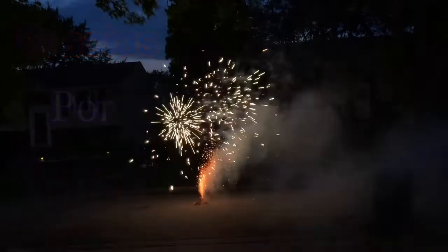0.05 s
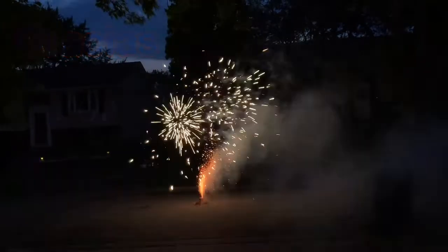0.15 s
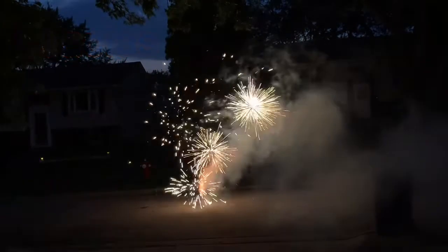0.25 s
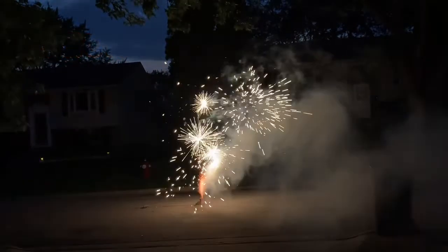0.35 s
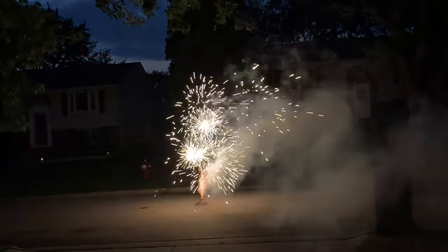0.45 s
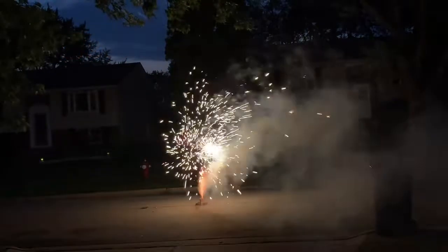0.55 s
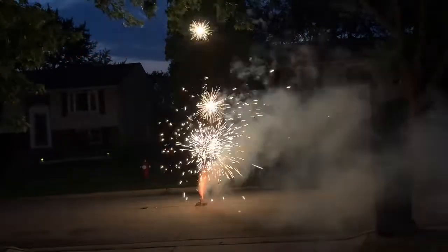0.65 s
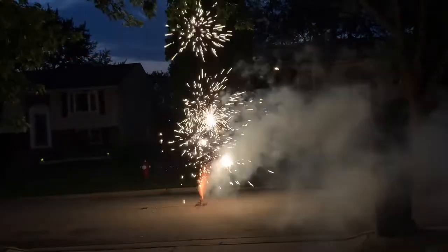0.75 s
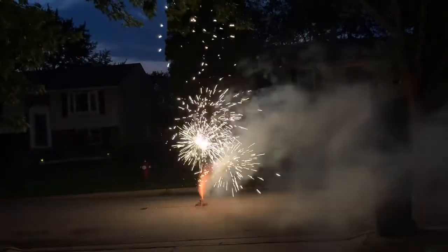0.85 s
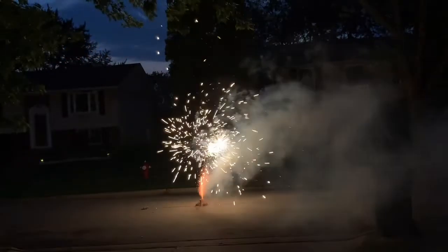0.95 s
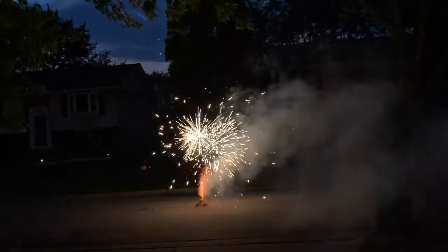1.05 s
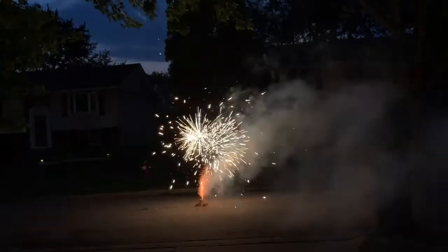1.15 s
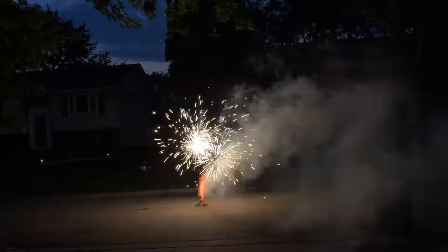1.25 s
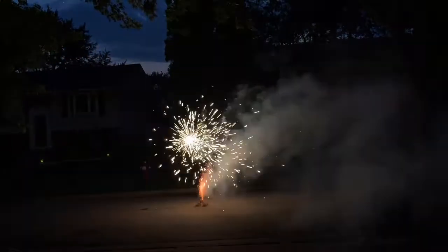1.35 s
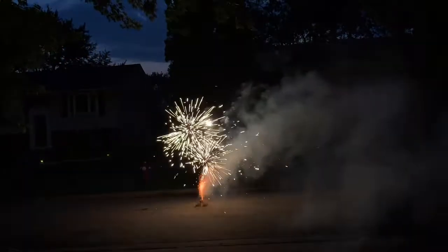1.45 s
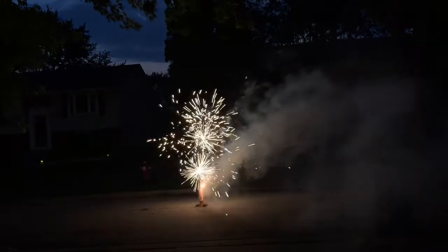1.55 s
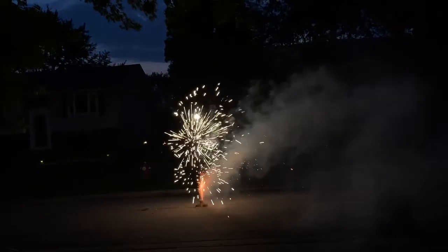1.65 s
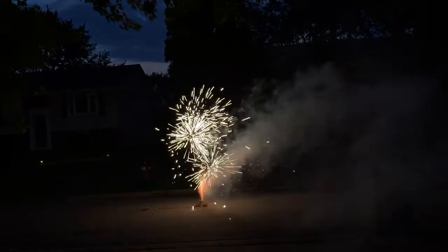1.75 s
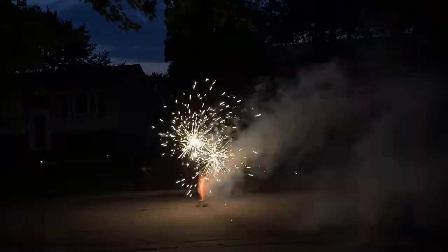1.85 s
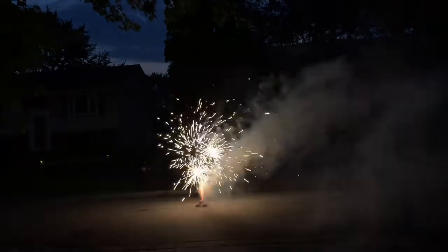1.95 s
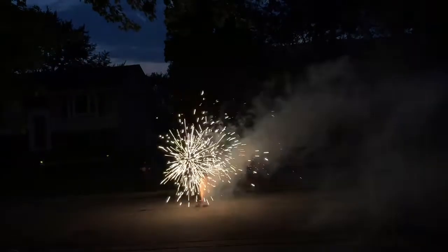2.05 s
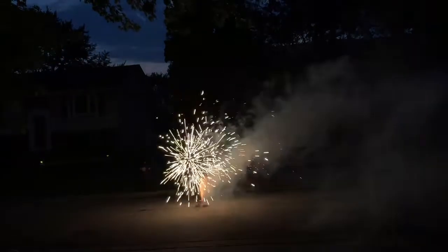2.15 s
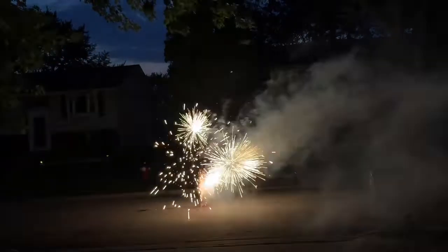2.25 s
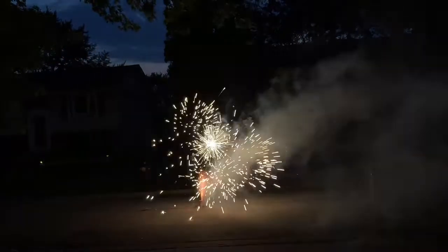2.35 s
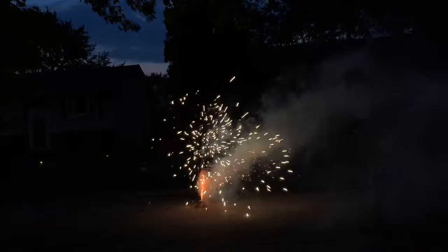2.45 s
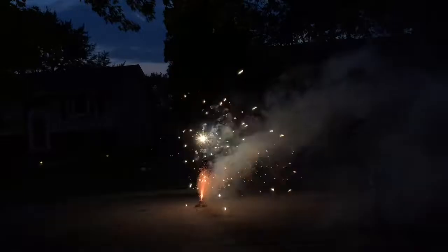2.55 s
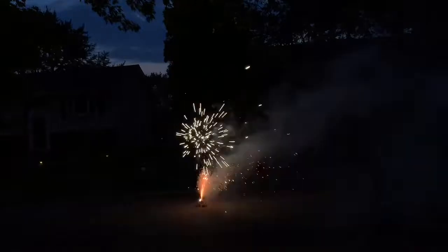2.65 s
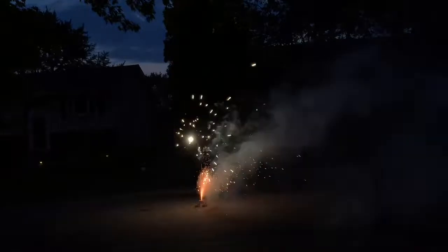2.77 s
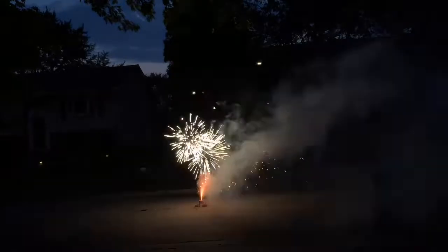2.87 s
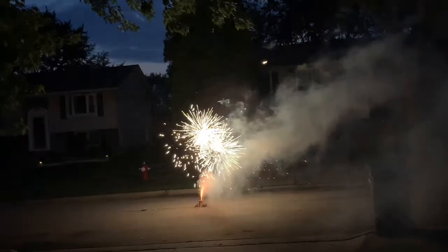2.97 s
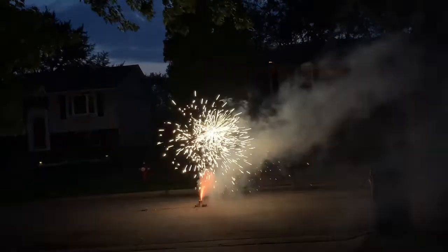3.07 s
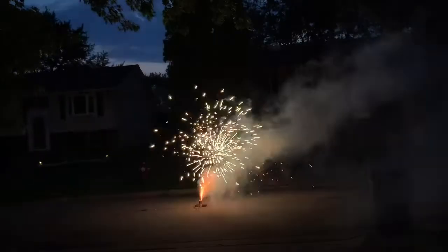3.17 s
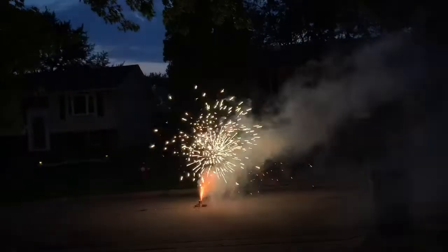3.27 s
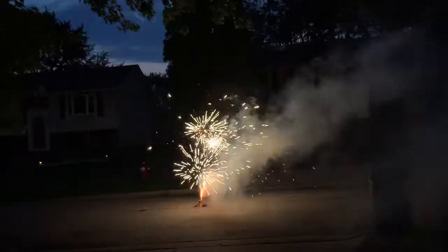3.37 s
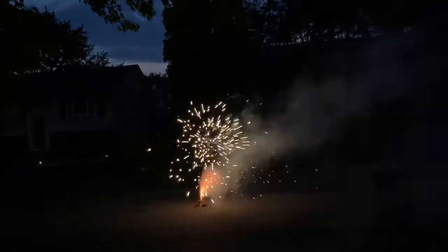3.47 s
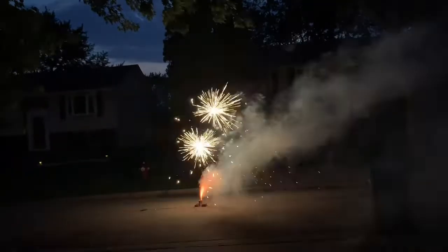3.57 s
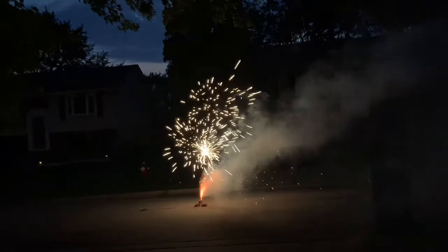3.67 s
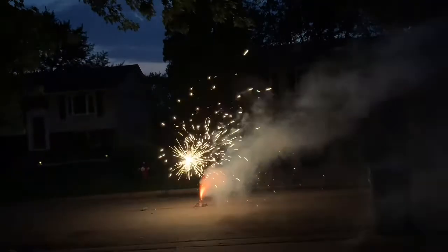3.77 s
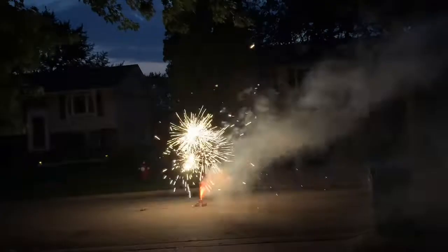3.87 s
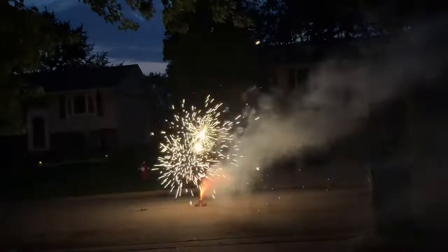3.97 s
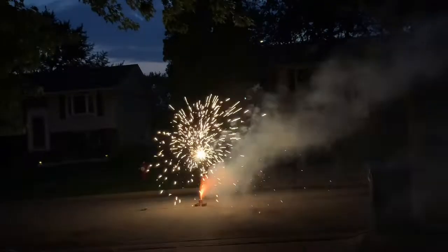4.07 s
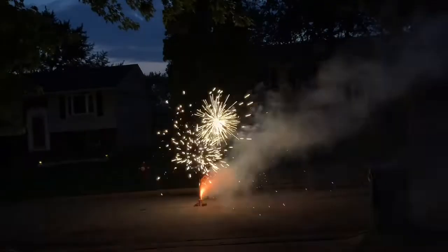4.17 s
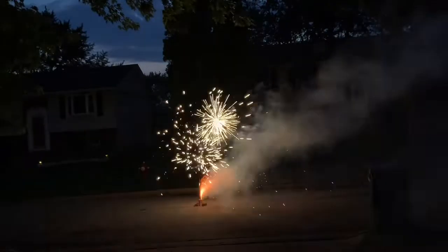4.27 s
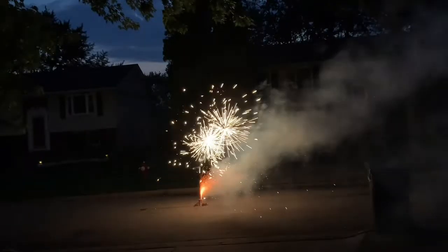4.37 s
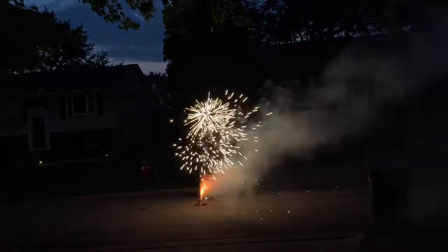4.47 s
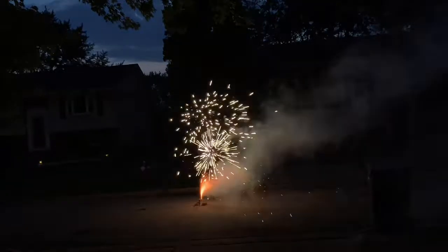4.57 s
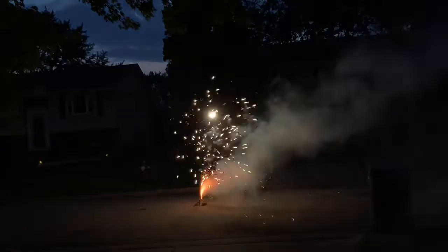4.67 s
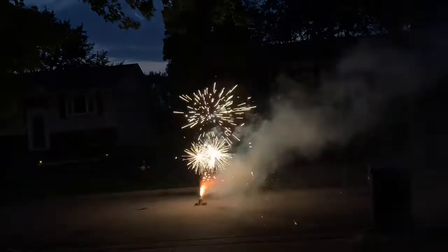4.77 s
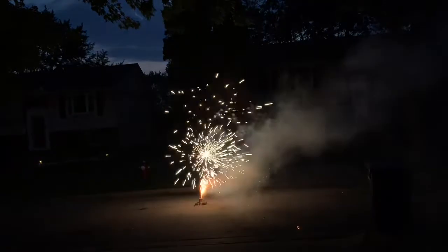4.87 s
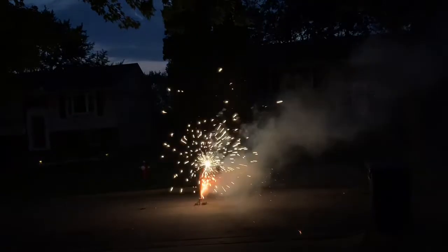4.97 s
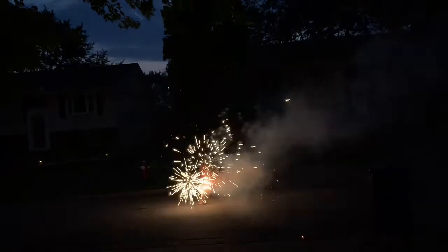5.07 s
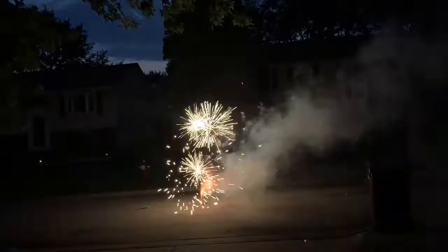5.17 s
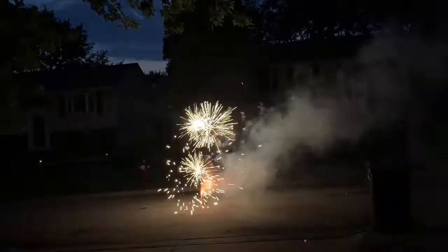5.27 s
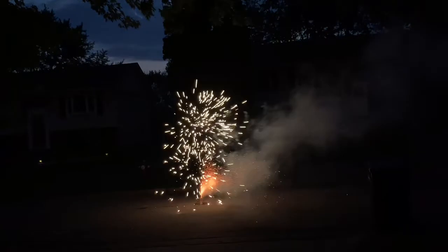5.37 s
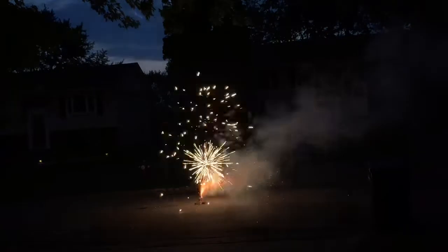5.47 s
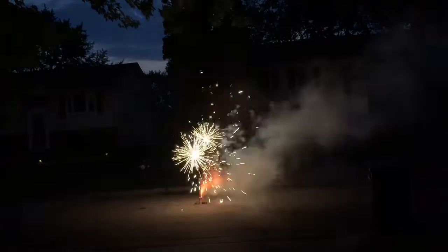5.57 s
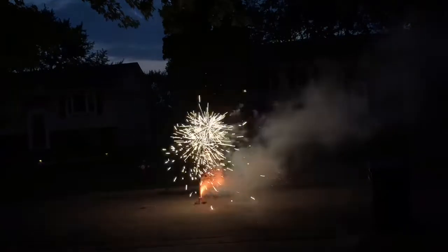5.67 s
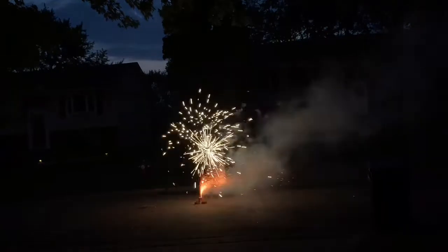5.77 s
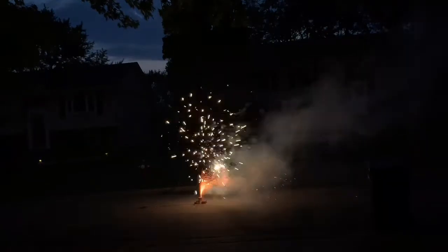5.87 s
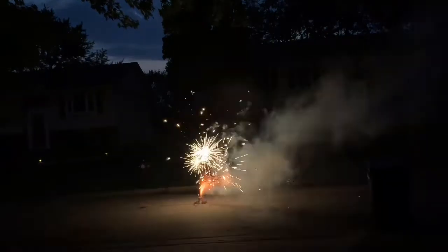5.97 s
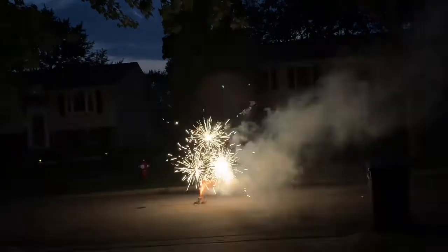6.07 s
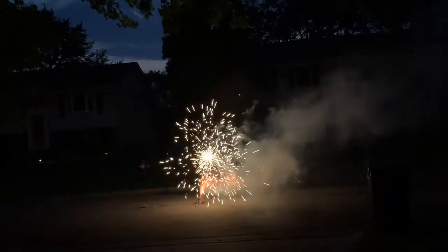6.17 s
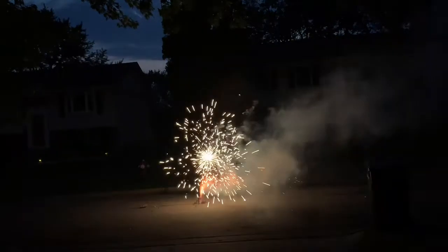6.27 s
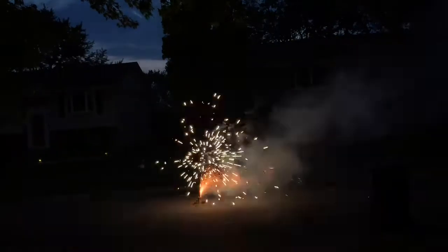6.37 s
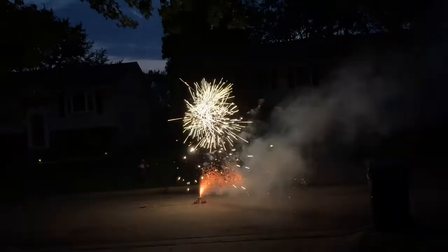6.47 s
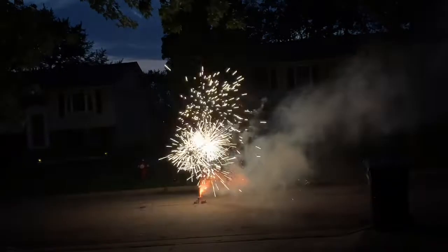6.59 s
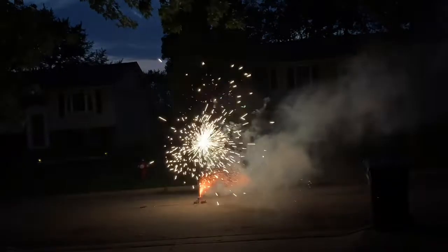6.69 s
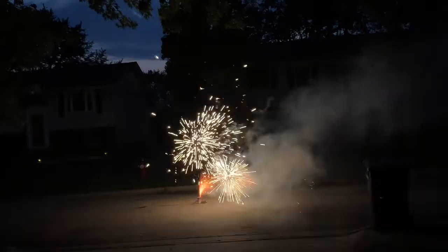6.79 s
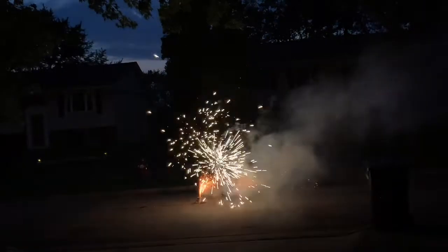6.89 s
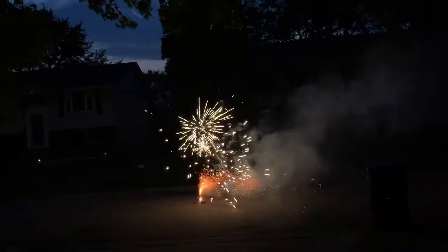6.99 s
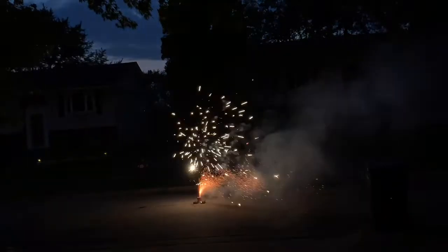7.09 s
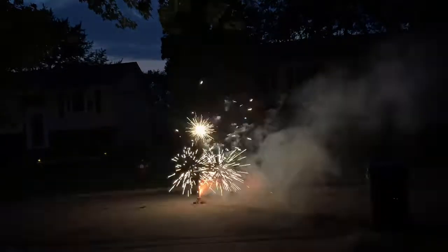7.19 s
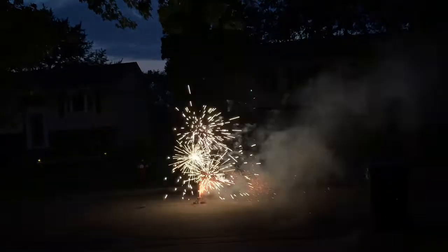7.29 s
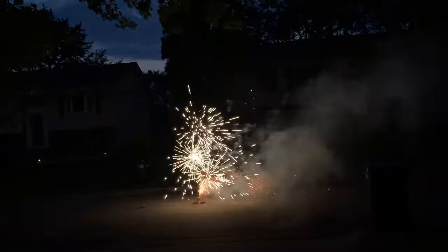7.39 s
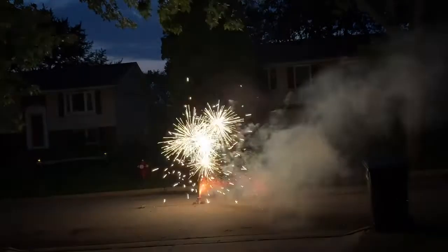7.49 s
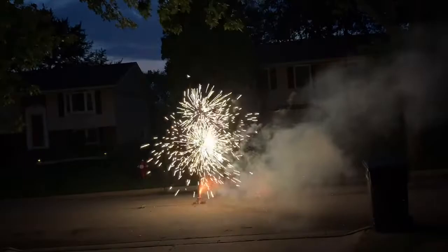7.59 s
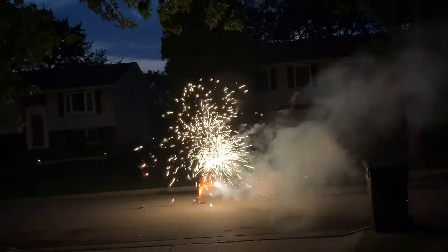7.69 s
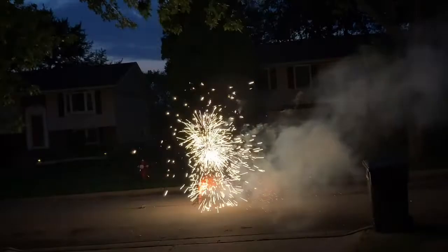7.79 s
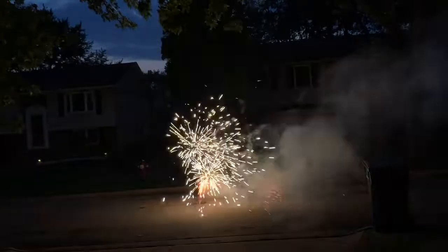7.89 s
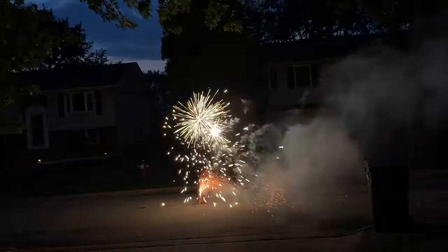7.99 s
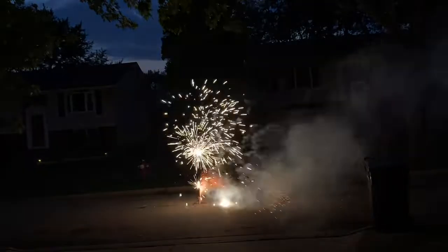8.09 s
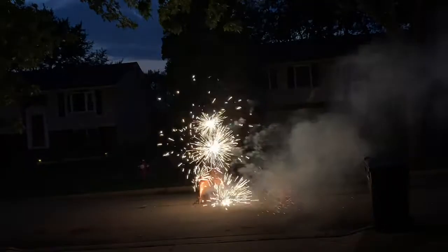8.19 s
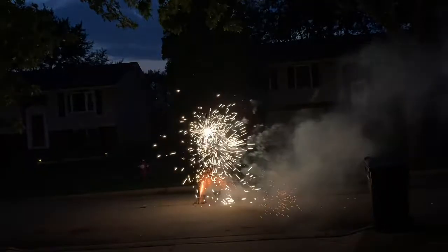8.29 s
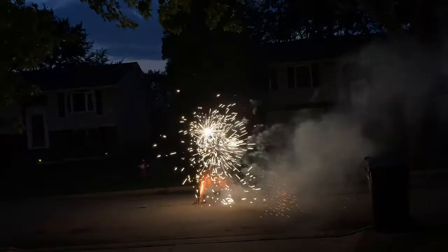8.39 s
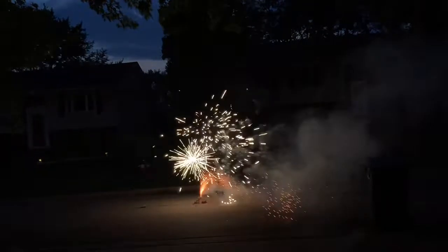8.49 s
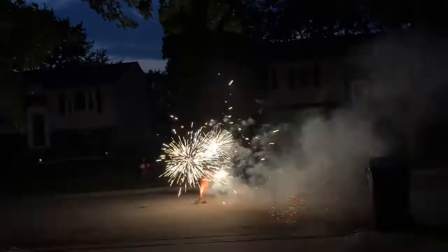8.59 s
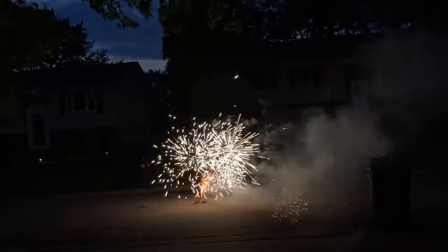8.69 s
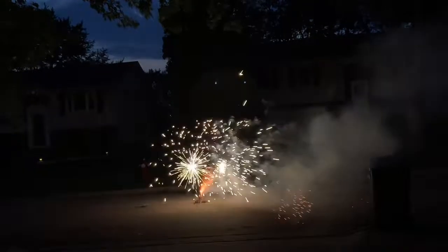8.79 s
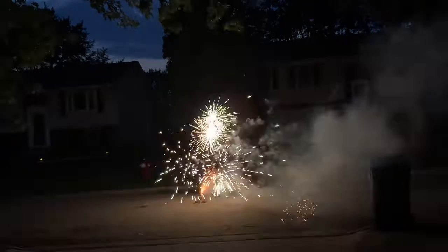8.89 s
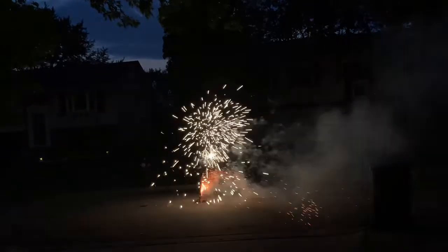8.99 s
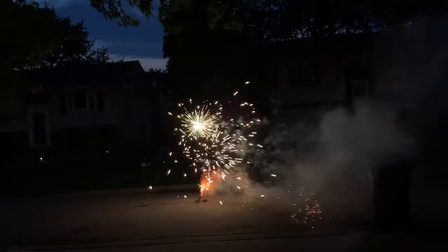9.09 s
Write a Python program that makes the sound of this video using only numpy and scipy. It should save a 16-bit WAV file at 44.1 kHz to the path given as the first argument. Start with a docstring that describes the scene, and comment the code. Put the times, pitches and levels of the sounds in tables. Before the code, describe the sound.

Continuous outdoor crackle from a ground firework: bright, hard pops centred in the upper mids, irregularly spaced, sometimes in tight clusters, with tiny snaps filling the gaps. Beneath lies a soft hiss and a rough, echoing wash from road and houses. Little deep bass, only light puffs. The narrow, overloaded microphone gives the loudest cracks a ragged treble edge. Brief thinner moments midway, then a denser flurry in the last two seconds.

```python
"""Sharp, irregular pops crackle over a hissing jet: a fountain firework on a street, some metres from a small camera.
Each star bursts as a short crack with a slower push of air, and comes again off the asphalt; small sparks snap between.
House fronts and trees return a long noise wash, kerbs and cars a short one. The two channels differ in timing
and colour; the narrow microphone path overloads on the loudest pops, and ragged treble follows."""
import sys
import numpy as np
from scipy import signal
from scipy.fft import rfft, irfft, next_fast_len
from scipy.io import wavfile

SR = 44100
rng = np.random.default_rng(int(sys.argv[2]) if len(sys.argv) > 2 else 0)


def to_wav(sig):
    """Store sig (one row per channel, or 1-D mono) as 16-bit WAV at the path in sys.argv[1].

    Samples outside -1..1 are clipped; the rate is SR.
    """
    pcm = np.clip(np.atleast_2d(sig), -1, 1) * 32767
    pcm = np.round(pcm).astype(np.int16)
    wavfile.write(sys.argv[1], SR, pcm.T)  # frames by channels


N = 403059
HZ = np.fft.rfftfreq(next_fast_len(N), 1 / SR)

# Star bursts: (time [s], relative crack level [dB], lag of the bounce off the asphalt [ms])
STAR_BURSTS = [(0.0568, -6, 4.3), (0.0631, -7.5, 4.3), (0.1454, -5.5, 4.1), (0.2495, -5, 2.2),
               (0.2798, -12, 3.5), (0.2857, -5.5, 4.1), (0.404, -9.5, 2.9), (0.433, -5, 3.4),
               (0.443, -8, 4.3), (0.5324, -7.5, 2.6), (0.5401, -9.0, 3.3), (0.6557, -7.5, 3.7),
               (0.678, -8.5, 3.5), (0.7315, -9, 3.8), (0.7663, -9, 3.9), (0.7729, -4.5, 4.1),
               (0.787, -7, 4.3), (0.7982, -10, 4.8), (0.8813, -5, 5.7), (0.8992, -6, 4.3),
               (0.9074, -11.5, 6.3), (0.9789, -6, 4.4), (1.0098, -7.5, 4.1), (1.1052, -8.5, 4.3),
               (1.1201, -8, 3.1), (1.1812, -6.6, 5), (1.2186, -10.5, 4.8), (1.2681, -7, 3.3),
               (1.3136, -6.5, 4.0), (1.3224, -7, 4), (1.4164, -6.0, 4.4), (1.4876, -7.3, 5.3),
               (1.5092, -6, 2.7), (1.5609, -12.5, 5.7), (1.6318, -5.8, 4.3), (1.6459, -7.5, 2.4),
               (1.7146, -7.0, 4.8), (1.7993, -6.5, 5.8), (1.8335, -5, 3.1), (1.9679, -5.5, 3.4),
               (1.9802, -6, 4.3), (2.0239, -4, 4), (2.1032, -5, 2.9), (2.1082, -11.5, 3.7),
               (2.1611, -4, 3.6), (2.2745, -10.5, 3.1), (2.3049, -8.5, 5.0), (2.3353, -6, 2.3),
               (2.4237, -8, 4.2), (2.6886, -5.5, 4.4), (2.914, -11.5, 4.1), (2.9445, -8.5, 4.6),
               (3.0552, -5, 3.4), (3.0757, -7, 5.8), (3.1108, -8, 4.9), (3.1235, -6.5, 3.9),
               (3.1312, -6.5, 4.2), (3.1918, -4.5, 4.9), (3.2683, -4, 4.1), (3.3749, -6.5, 2.8),
               (3.389, -10.5, 4), (3.4596, -6.5, 4.2), (3.643, -6.5, 6.1), (3.6584, -5, 3.5),
               (3.7806, -9, 3.6), (3.8793, -3, 3.5), (3.9386, -6, 3.9), (3.9713, -8.5, 5.2),
               (3.9797, -5.5, 5.3), (4.012, -9, 3.3), (4.0354, -4.5, 3.4), (4.1173, -6.5, 4.6),
               (4.2436, -5.5, 3.7), (4.3055, -6.5, 5.4), (4.4063, -5, 4.9), (4.4258, -6.5, 5.1),
               (4.5192, -6.5, 7.3), (4.6226, -7.5, 2.8), (4.8106, -6.0, 5.8), (4.89, -6.5, 3.8),
               (4.9003, -7.1, 3.3), (5.0103, -7.5, 3.7), (5.1266, -4.5, 2.8), (5.1901, -8, 2.09),
               (5.2931, -8, 5.5), (5.3318, -8.5, 2.6), (5.3356, -4.5, 5.3), (5.5297, -6.5, 2.9),
               (5.6556, -5.0, 3.8), (5.6704, -5.5, 4.2), (5.732, -9.4, 4.8), (5.748, -5.5, 4.9),
               (5.8704, -7, 3.5), (6.0419, -5.5, 2.7), (6.1095, -5, 3.5), (6.122, -10, 3.0),
               (6.2152, -7.5, 3), (6.2279, -7.5, 4.0), (6.2319, -9, 3.1), (6.3518, -6.5, 3.2),
               (6.5088, -6, 5.1), (6.5197, -5.7, 3.2), (6.5257, -5, 5.5), (6.6076, -9.5, 2.5),
               (6.6212, -4.5, 3.9), (6.6468, -4, 4.7), (6.6558, -6, 2.9), (6.6813, -7, 4.3),
               (6.778, -4.5, 3.9), (6.8315, -4.5, 4.5), (6.8705, -3.5, 2.1), (6.934, -3.5, 3.1),
               (7.0681, -5.5, 4.9), (7.1356, -16.5, 4.3), (7.2735, -11, 2.6), (7.2968, -6.5, 2.5),
               (7.3617, -4.5, 5.2), (7.4165, -6.5, 2.6), (7.4446, -6, 2.9), (7.5394, -4, 2.24),
               (7.5554, -6.0, 3.7), (7.5765, -5, 3.3), (7.6225, -4, 5.3), (7.651, -8.5, 2.9),
               (7.7027, -6, 4.3), (7.7224, -7, 2.8), (7.757, -7, 4), (7.7861, -6.5, 3.7),
               (7.8176, -6.7, 2.9), (7.8312, -5, 2.4), (7.8602, -7, 4.0), (7.8696, -6, 4.7),
               (7.9144, -8, 2.7), (7.9694, -5, 3.9), (7.9864, -9, 3.7), (8.096, -3.5, 5.5),
               (8.1346, -5.5, 4.5), (8.1882, -5.5, 3.9), (8.2307, -8, 3.5), (8.2801, -5.5, 4.3),
               (8.3264, -4.6, 3.8), (8.3464, -9.5, 6.1), (8.4188, -7.5, 3.6), (8.4627, -4, 4.6),
               (8.5466, -9, 3.0), (8.5714, -5.5, 3.6), (8.6355, -5, 3.1), (8.682, -6.5, 4.1),
               (8.7099, -7, 2.9), (8.7214, -5.5, 3.3), (8.7535, -5.5, 3.4), (8.898, -8, 3),
               (8.939, -10.5, 2.3), (9.0128, -5.5, 2.1), (9.0181, -6, 4.3), (9.0342, -8, 5.7)]
# Bursts with a somewhat stronger low push: (time [s])
STRONG_PUSH_S = [0.2857, 0.7729, 4.8106, 6.2319, 6.5197, 7.2968, 7.3617, 7.5394, 8.2801]
# Bursts with a weaker low push: (time [s])
WEAK_PUSH_S = [0.7315, 3.2683, 4.6226, 5.1266, 6.0419]
# Bounce off the asphalt, weakest from middle heights: (lag [ms], level against the burst [dB])
ASPHALT_BOUNCE = [(2.5, -.5), (3.2, -1.5), (4.3, -7.5), (5.7, -1)]
# Spectrum shape of the sharp front of a burst: (frequency [Hz], relative level [dB])
CRACK_COLOUR = [(1500, -52), (1900, 9), (2600, 13.5), (3300, 12), (4200, 7.5), (5300, 1), (6800, 3.5),
                (9500, -50.5)]
# Spectrum shape of the street's wash and the jet: (frequency [Hz], relative level [dB])
STREET_COLOUR = [(90, -8.5), (200, -3.5), (900, -1.5), (1550, -3), (2500, 1.5), (3500, -1.5), (4500, -8),
                 (5400, -18)]
# Swell of the whole wash, jet included: (time [s], gain [dB])
WASH_VIGOUR = [(0, 4), (1, 1.65), (2.7, 1.5), (5.3, -0.1), (7.2, 0.46), (7.8, 2.5), (9.14, 1)]
# Likeness of the two channels: (frequency [Hz], likeness [0 to 1])
CHANNEL_LIKENESS = [(90, 0.77), (200, 1), (550, 0.38), (950, 0.043), (1700, 0.043), (2300, 0.97),
                    (5500, 0.77)]
# Colour of the right channel: (frequency [Hz], level against the left [dB])
RIGHT_COLOUR = [(90, 1.5), (140, -12), (230, -3), (900, 4), (1500, 2.5), (2000, 1)]

# crack: gain, spread of brightness between stars, and phase [rad]: the swing after the front outweighs the one before
CRACK_DB, CRACK_TILT, CRACK_TURN = 2, 0.54, 1.05
# a star breaks in two: the second piece is this late [ms] and about this weak
SPLIT_MS, SPLIT_DB = (0.3, 1.2), -7
BOUNCE_SCATTER_DB = 1.5
# low push of a burst: offset, and dB of push per dB of crack
PUSH_DB, PUSH_GROWTH = -0.5, 0.97
STRONG_PUSH_DB, WEAK_PUSH_DB = 2, -5.5  # added to the push
BODY_HZ, BODY_GAIN, BODY_SCATTER_DB = (148, 983), 7.27, 1  # slower push behind the front
BLOOM_HZ, BLOOM_GAIN = (200, 323), 2.83  # the deep part rings on a moment
SPARKS_PER_S, SPARK_DB, SPARK_SCATTER_DB = 150, -30, 3.0
HEFT = 1.16  # exponent: low sound of sparks falls faster than their crack
GRIT_DB, GRIT_T60_S = -41.5, 0.043  # the rough road scatters the crack
# low shove of air; it grows faster than the push (exponent)
THUMP_HZ, THUMP_DB, THUMP_GROWTH = (24.3, 83), -48, 1.3
# street echoes and jet: levels before colour and swell
STREET_DB, STREET_RISE_S, STREET_T60_S = -35, 0.013, 1
JET_DB = -41.5
# dull returns from kerbs, cars and bins close by
SCATTER_HZ, SCATTER_DB, SCATTER_T60_S = (109, 2440), -39, 0.035
# unevenness of the noise puffs: random step [dB], and its cap in steps
RAGGED_DB, RAGGED_MOST = 5.0, 3.0
# treble reaches the right first [ms], with a phase turn [rad]
RIGHT_LEAD_MS, RIGHT_TURN = 0.6771, -1.414
# pops blurred into short puffs, right channel only
RIGHT_BLUR_HZ, RIGHT_BLUR_DB, RIGHT_BLUR_T60_S = (300, 3020), -35.5, 0.053
# microphone's upper edge, also the top of the echoes and sparks
STREET_TOP_HZ = MIC_HZ = 5770
MIC_LEAK_DB = -26.5  # what passes above the edge, ahead of the overload
CEILING, KNEE = 0.54, 14.0  # peak limit, and how abruptly it is met
SPRAY_DB, SPRAY_T60_S = -29, 0.03  # ragged trailing treble
TOP_HZ = 16300  # final low-pass


def bursts():
    """Click trains for each star, its second piece and its bounce, plus small sparks that snap at random."""
    s, db, lag_ms = np.transpose(STAR_BURSTS)
    bounce_luck, body_luck, tilt_luck, delay_luck, split_luck = rng.standard_normal((len(s), 5)).T

    split_s = s + np.interp(delay_luck, (-2, 2), SPLIT_MS) / 1000
    split_db = np.minimum(SPLIT_DB * (1 + split_luck / 2), -1)
    bounce_s = s + lag_ms / 1000
    bounce_db = np.interp(lag_ms, *np.transpose(ASPHALT_BOUNCE)) + BOUNCE_SCATTER_DB * bounce_luck

    push_db = PUSH_DB + PUSH_GROWTH * db + BODY_SCATTER_DB * body_luck
    push_db = push_db + STRONG_PUSH_DB * among(s, STRONG_PUSH_S) + WEAK_PUSH_DB * among(s, WEAK_PUSH_S)

    spark_happens = rng.random(N) < SPARKS_PER_S / SR
    sparks = spark_happens * undb(SPARK_DB + SPARK_SCATTER_DB * rng.standard_normal(N))

    clicks, tilted, heavy = np.zeros((3, N))
    for when, loss_db in ((s, 0), (split_s, split_db), (bounce_s, bounce_db)):
        at = (when * SR).astype(int)
        strength = undb(db + loss_db)
        np.add.at(clicks, at, strength)
        np.add.at(tilted, at, strength * CRACK_TILT * tilt_luck)
        np.add.at(heavy, at, undb(push_db + loss_db))
    return clicks, tilted, heavy, sparks


def among(s, times):
    """Which bursts are in, or within about 2 ms of, a list of times."""
    return np.isclose(np.c_[s], times, atol=0.0022).any(axis=1)


def pop(clicks, tilted, heavy):
    """A short swing around 3 kHz, brighter or duller from star to star, then a slower push of the other sign."""
    crack = undb(along(CRACK_COLOUR))
    crack = undb(CRACK_DB) * np.exp(1j * CRACK_TURN) * crack / crack.mean()
    front = shape(clicks, crack)
    tilt = shape(tilted, crack * np.log2((HZ + 1) / 3000))
    body = BODY_GAIN * band(heavy, BODY_HZ)
    bloom = BLOOM_GAIN * band(heavy, BLOOM_HZ)
    return body + bloom - front - tilt


def spark_snaps(sparks):
    """Small pops of random brightness, duller than the stars because their treble is cut."""
    snaps = pop(sparks, sparks * rng.standard_normal(N), sparks ** HEFT)
    return shape(snaps, HZ < STREET_TOP_HZ)


def road_grit(clicks):
    """The rough road scatters each crack into a brief puff of noise of the same colour."""
    colour = undb(along(CRACK_COLOUR)) * (HZ < STREET_TOP_HZ)
    return level(shape(puffs(clicks, GRIT_T60_S, 0.0019), colour), GRIT_DB)


def thump(pushes):
    """A slow swing of air after each burst, deepest part last: three band-passes in a row delay it."""
    shove = pushes ** THUMP_GROWTH
    for _ in range(3):
        shove = band(shove, THUMP_HZ)
    return level(shove, THUMP_DB)


def wash(pushes):
    """Echoes from near clutter and far fronts over the jet's hiss, the fronts and jet in the colour of the street."""
    fronts = level(puffs(pushes, STREET_T60_S, STREET_RISE_S), STREET_DB)
    # countless small surfaces: their echoes differ from burst to burst
    clutter = level(band(puffs(pushes, SCATTER_T60_S, 0.011), SCATTER_HZ), SCATTER_DB)
    jet = level(rng.standard_normal(N), JET_DB)
    colour = undb(along(STREET_COLOUR)) * (HZ < STREET_TOP_HZ)
    far = shape(fronts + jet, colour / np.sqrt(np.mean(colour ** 2)))
    near = shape(clutter, HZ < STREET_TOP_HZ)
    vigour = undb(np.interp(np.arange(N) / SR, *np.transpose(WASH_VIGOUR)))
    return vigour * (far + near)


def puffs(clicks, t60, rise):
    """Uneven noise that flares after each click and dies away: click power spread over an echo envelope."""
    power = shape(clicks ** 2, rfft(fading(t60, rise) ** 2, next_fast_len(N)))
    ragged = undb(RAGGED_DB * np.minimum(rng.exponential(size=N), RAGGED_MOST))
    return np.sqrt(np.abs(power)) * level(rng.standard_normal(N) * ragged, 0)


def fading(t60, rise):
    """Envelope of an echo field that builds up, then dies away."""
    t = np.arange(int(t60 * SR)) / SR
    return (1 - np.exp(-t / rise)) * undb(-60 * t / t60)


def right_channel(left, pushes):
    """The left turned in time and colour, mixed with an unlike share: other echoes and blurred pops."""
    blur = level(band(puffs(pushes, RIGHT_BLUR_T60_S, 0.0067), RIGHT_BLUR_HZ), RIGHT_BLUR_DB)
    other = shape(blur, HZ < STREET_TOP_HZ) + wash(pushes)
    alike = np.clip(along(CHANNEL_LIKENESS), 0, 1)
    # treble leads on the right, bass lags
    treble = np.clip((HZ - 500) / 1000, 0, 1)
    lead = 2 * np.pi * HZ * RIGHT_LEAD_MS / 1000 + RIGHT_TURN
    turn = np.exp(1j * (treble * lead - (1 - treble) * HZ / 300))
    gain = undb(along(RIGHT_COLOUR))
    return shape(left, gain * alike * turn) + shape(other, gain * np.sqrt(1 - alike ** 2))


def undb(db):
    """Decibels to an amplitude factor."""
    return 10 ** (np.asarray(db) / 20)


def level(x, db):
    """Set the rms level."""
    return x * undb(db) / np.sqrt(np.mean(x ** 2))


def along(table):
    """A (frequency [Hz], value) table read at every frequency bin, on a log frequency axis."""
    hz, value = np.transpose(table)
    return np.interp(np.log(HZ + 1), np.log(hz), value)


def band(x, hz):
    """Causal band-pass."""
    return signal.sosfilt(signal.butter(2, hz, "band", fs=SR, output="sos"), x)


def shape(x, gain):
    """Weight every frequency bin by a gain."""
    size = next_fast_len(N)
    return irfft(rfft(x, size) * gain, size)[..., :N]


def scene():
    """Bursts, sparks and road grit direct, with thump and wash behind; left and right channels."""
    clicks, tilted, heavy, sparks = bursts()
    direct = pop(clicks, tilted, heavy) + spark_snaps(sparks) + road_grit(clicks)
    pushes = heavy + sparks ** HEFT
    left = direct + wash(pushes) + thump(pushes)
    return np.array([left, right_channel(left, pushes)])


def record(dry):
    """A narrow microphone path; the loudest peaks near the ceiling and splash into the treble."""
    edge = 1 / (1 + (HZ / MIC_HZ) ** 48)
    narrow = shape(dry, np.maximum(edge, undb(MIC_LEAK_DB)))
    held = narrow / (1 + np.abs(narrow / CEILING) ** KNEE) ** (1 / KNEE)
    soft = shape(held, np.minimum(MIC_HZ / (HZ + 1), 1))
    # whatever lies above the edge, overload products included, trails off as ragged noise
    splash = shape(held, HZ > MIC_HZ)
    spray = np.array([puffs(x, SPRAY_T60_S, 0.00065) for x in splash])
    spray = shape(spray, (HZ > MIC_HZ) * (MIC_HZ / (HZ + 1)) ** 2)
    low_pass = signal.ellip(8, 0.2, 70, TOP_HZ, fs=SR, output="sos")
    return signal.sosfilt(low_pass, soft + undb(SPRAY_DB) * spray)


dry = scene()
out = record(dry)
to_wav(out)
```